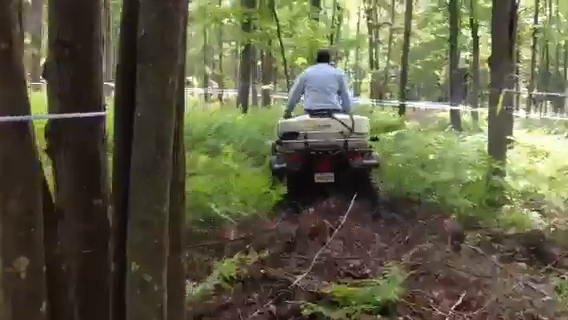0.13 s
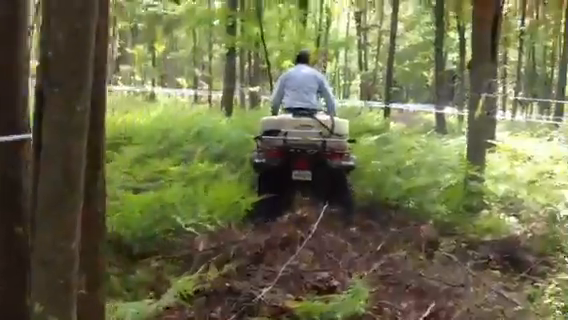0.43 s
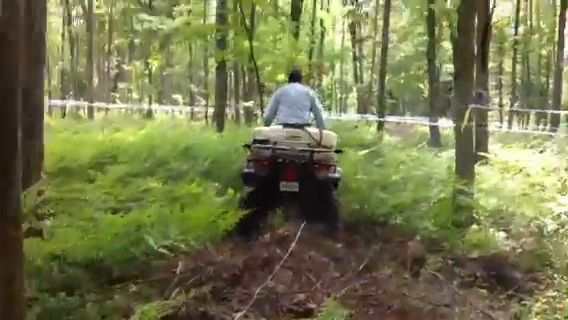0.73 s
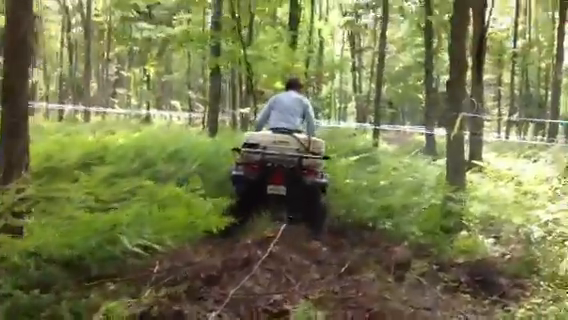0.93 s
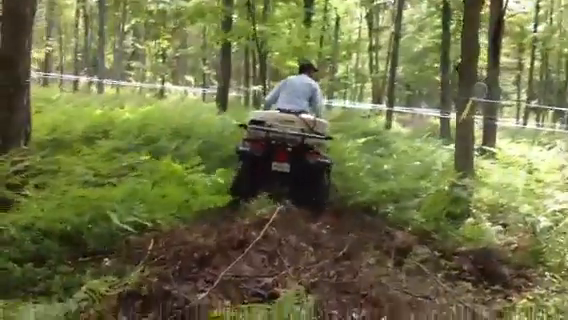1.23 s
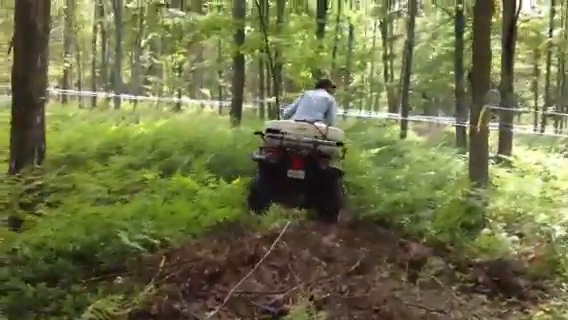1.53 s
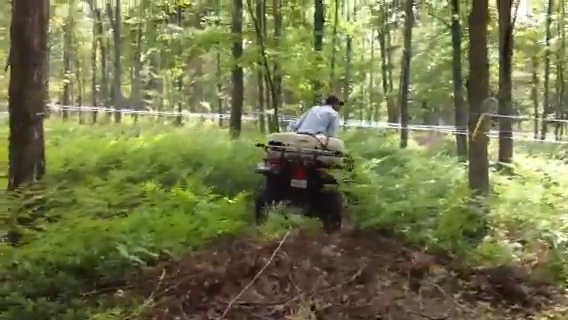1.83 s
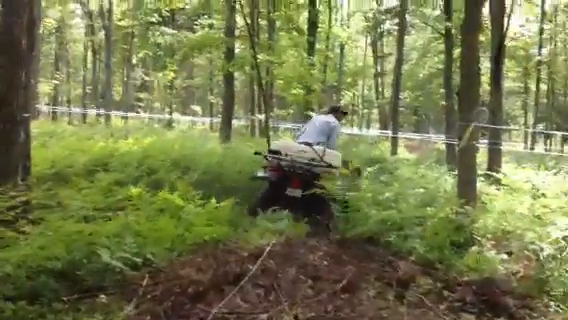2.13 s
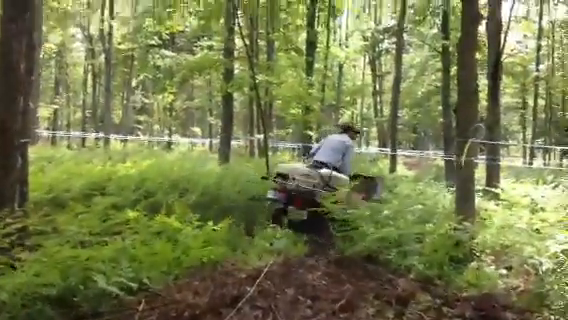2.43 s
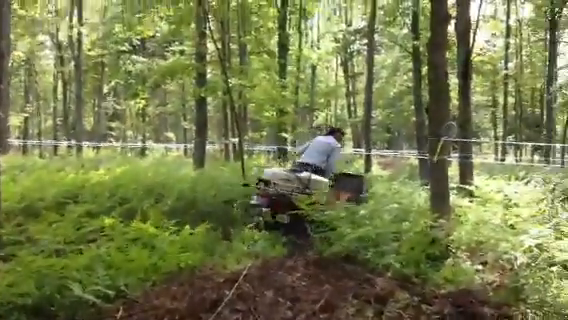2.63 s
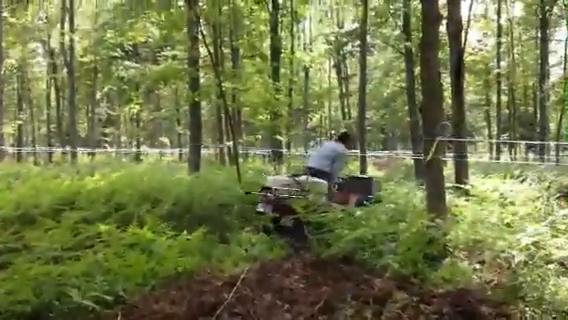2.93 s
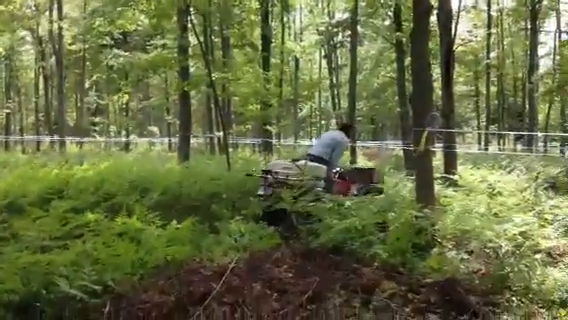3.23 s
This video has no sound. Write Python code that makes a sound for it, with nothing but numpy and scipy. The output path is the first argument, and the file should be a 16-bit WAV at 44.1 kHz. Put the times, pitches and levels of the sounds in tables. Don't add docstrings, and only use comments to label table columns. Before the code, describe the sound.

A small all-terrain vehicle engine chugs unevenly through brush, with twigs snapping and leaves hissing.

```python
import sys
import numpy as np
from scipy import signal
from scipy.io import wavfile
from scipy.ndimage import uniform_filter1d

SR = 44100
rng = np.random.default_rng(int(sys.argv[2]) if len(sys.argv) > 2 else 0)


def inscribe(sig):
    pcm = np.round(np.clip(np.atleast_2d(sig).T, -1, 1) * 32767)
    wavfile.write(sys.argv[1], SR, pcm.astype(np.int16))


def ratio_of_db(decibels):
    return 10 ** (np.asarray(decibels, float) / 20)


N = 149940

# (time [s], firing rate [1/s])
FIRING_RATE = [(0.0, 18.75), (0.18, 19.44), (0.25, 17.21), (0.58, 14.92), (0.7, 20.57), (1.03, 20.88),
               (1.21, 15.69), (1.38, 18.98), (1.69, 19.37), (1.77, 15.99), (1.88, 19.79), (2.21, 17.66),
               (2.47, 20.47), (2.66, 17.86), (2.82, 17.86), (2.94, 19.16), (3.11, 18.82), (3.4, 21.19)]
# (time [s], boom level [dB], knock level [dB], gas level [dB])
ENGINE_LOAD = [(0, -36, -45, -39), (.17, -34, -43, -37.5), (.27, -47.5, -52, -50.5),
               (.4, -40.5, -52.5, -48.5), (.53, -42, -44.5, -47), (.645, -37.5, -39.5, -34),
               (1.04, -34.5, -38, -38.5), (1.145, -42, -54, -49), (1.26, -42, -42, -42.5),
               (1.33, -34.5, -43, -34), (1.59, -40, -42.5, -42.5), (1.745, -45.5, -49, -44.5),
               (1.865, -36.5, -40, -33.5), (2.18, -40.5, -43.5, -47), (2.44, -39, -42.5, -34.5),
               (2.66, -43, -47.5, -49.5), (2.9, -42, -47, -43), (3.4, -40.5, -43, -41)]
# (time [s], brush level [dB], treble level [dB], body level [dB])
HISS_LEVELS = [(0.0, -33.5, -37, -35.5), (0.1, -34.5, -30.5, -35.5), (.2, -35, -34.5, -36.5),
               (0.38, -40, -34, -40), (0.63, -43, -34, -41.5), (0.84, -36.5, -35, -38.5),
               (1.05, -41, -35.5, -38.5), (1.3, -41, -37.5, -42.5), (1.55, -40, -36.5, -40),
               (1.8, -42.5, -39, -43), (2.08, -42.5, -37.5, -40.5), (2.3, -38.5, -37, -40),
               (2.58, -44, -38.5, -42.5), (2.74, -43.5, -39.5, -42), (3.1, -40.5, -36.5, -41),
               (3.4, -38, -37.5, -41.5)]
# (frequency [Hz], level [dB], T60 [s])
KNOCK_MODES = [(242, 0, .11), (266, -3, .075), (305, -2, .045), (350, -9, .12), (165, -2, .06)]
# (frequency [Hz], level [dB], T60 [s])
BARK_MODES = [(405, 4, 0.0032), (642, -10, 0.031), (980, 3.5, 0.0027), (1590, -11.5, 0.008),
              (2300, -10, 0.005)]
# (delay after firing [s], level [dB], rise [s], fall [s])
GAS_PUFFS = [
    (.0036, 4, .0004, .002),
    (.012, 0, .001, .0026),
    (.0205, -11, .001, .004),
    (.005, -12, .003, .018),
]
# (centre [Hz], width [Hz], gas level [dB], hiss level [dB], snap level [dB])
RESONANCES = [(328, 176, -25, -12, -17), (633, 120, -3.5, -13.5, -3.5), (860, 1080, -11, -8, 33),
              (1592, 690, 3.5, -2.5, 16), (2060, 360, -27, -15.5, 17), (3730, 810, -43, -11, -57),
              (4717, 88, -12, -16.5, -10.5), (6000, 1230, 0, -6, -8.5), (7130, 3540, -48, -1, -1),
              (11330, 1320, 2.5, -3.5, 2), (12500, 2000, -16, -4, -74)]
# (time [s], peak level [dB], centre [Hz], decay [s])
TWIG_SNAPS = [(0.0556, -8.5, 8100, 0.0026), (0.398, -15, 12200, 0.003), (0.553, -30, 7000, .002),
              (1.5819, -11.5, 6000, 0.0019), (1.733, -14.5, 6940, 0.0034), (2.097, -11.5, 6500, 0.0016),
              (2.2309, -5, 7400, 0.0011), (2.254, -21, 6000, .002), (2.316, -12, 8800, 0.0022),
              (3.012, -27, 6000, 0.0022), (3.034, -13, 8200, .002), (3.174, -16, 11000, 0.003),
              (3.2594, -9, 9000, 0.0046), (3.279, -15, 6500, 0.0043), (3.3744, -17, 9200, 0.0035),
              (3.394, -25, 8000, 0.0033)]
# (time [s], peak level [dB], centre [Hz], decay [s])
BRANCH_SNAP = [
    (3.2598, -12.5, 2500, .0045),
    (3.2605, -24, 900, .006),
]
# (time [s], peak level [dB], frequency [Hz])
PANEL_TICKS = [(0.0578, -17.5, 2050), (0.1186, -20, 1830), (0.1253, -20, 1570), (0.1613, -25, 1390),
               (0.2242, -21.5, 1880), (0.5501, -28, 2000), (0.6442, -14.5, 1650), (0.6967, -24, 1250),
               (0.7474, -25, 1370), (0.9408, -20, 1820), (0.9882, -28, 1760), (1.043, -25.5, 1580),
               (1.0846, -29, 1700), (1.2098, -25, 1700), (1.3723, -18.5, 2230), (1.425, -21.5, 1580),
               (1.4768, -22, 1590), (1.4885, -23, 1580), (1.5309, -21.5, 1710), (1.6432, -32, 1910),
               (1.696, -24, 1640), (1.8113, -28, 1550), (1.8568, -19.5, 1800), (1.9088, -17, 1880),
               (1.9574, -25, 1480), (2.0188, -27, 1820), (2.13, -22.5, 1530), (2.2927, -26.5, 1560),
               (2.339, -24, 1540), (2.3905, -25, 1810), (2.4406, -15.5, 1590), (2.4908, -20.5, 1640),
               (2.5417, -29, 1480), (2.6569, -22, 1550), (2.7122, -26, 1500), (2.825, -22.5, 1590),
               (2.8708, -25, 1630), (2.9337, -21, 1670), (3.0318, -21.5, 1590), (3.1562, -24, 1640),
               (3.1856, -35, 1470), (3.2453, -21, 1870), (3.3378, -21, 1810), (3.3843, -37, 1840)]
# (time [s], level [dB])
AIR_GULPS = [(.238, -34), (.35, -36), (.408, -32), (.468, -33), (.538, -35), (.603, -27), (1.108, -30),
             (1.153, -30), (1.218, -36), (1.278, -27), (1.715, -34), (1.77, -34)]


def curve(table, col):
    a = np.array(table)
    return np.interp(np.arange(N) / SR, a[:, 0], a[:, col])


def unit(x):
    return x / np.sqrt(np.mean(x ** 2))


def noise():
    return rng.standard_normal(N)


def band(x, hz, wide_hz):
    return signal.lfilter(*signal.iirpeak(hz, hz / wide_hz, fs=SR), x)


def ring(x, hz, t60):
    pole = np.exp((2j * np.pi * hz - np.log(1000) / t60) / SR)
    return signal.lfilter([1], [1, -pole], x).imag


def late(x, s):
    k = int(max(s, 0) * SR)
    return np.concatenate([np.zeros(k), x[:N - k]])


def swell(x, rise, fall):
    t = np.arange(int(SR / 10)) / SR
    shape = (1 - np.exp(-t / rise)) * np.exp(-t / fall)
    return signal.fftconvolve(x, shape / shape.max())[:N]


def walk(rate):
    k = int(SR / rate)
    steps = np.repeat(rng.standard_normal(N // k + 1), k)
    return 1.9 * uniform_filter1d(uniform_filter1d(steps, k), k)[:N]


def clicks(at, size):
    return np.bincount(at, size, N)[:N]


def brush():
    count = int(720 * N / SR)
    spread_db = 3 * np.minimum(rng.exponential(size=count), 4)
    size = ratio_of_db(spread_db) * ratio_of_db(2 * walk(6.85))[::N // count][:count]
    grains = swell(clicks(rng.integers(0, N, count), size), .0001, 0.00068)
    crackle = unit(grains * noise())
    out, surge = 0, walk(14)
    for hz, wide_hz, _, db, _ in RESONANCES:
        col = 2 if hz > 9000 else 1 if hz > 3000 else 3
        level = curve(HISS_LEVELS, col) + db
        if hz < 3000:
            level = level + 0.1 * (curve(ENGINE_LOAD, 3) + 40)
        level = level + .5 * surge + 1.62 * walk(14)
        out = out + ratio_of_db(level) * unit(band(noise() + ratio_of_db(-6) * crackle, hz, wide_hz))
    return ratio_of_db(-0.5) * out


def twigs():
    fall_db = 11.5
    tail, tail_s = .06, 0.024
    out = np.zeros(N)
    for s, db, centre, decay in TWIG_SNAPS + BRANCH_SNAP:
        i = int(s * SR)
        t = np.arange(min(2000, N - i)) / SR
        envelope = np.exp(-t / max(decay, 1e-4)) + tail * np.exp(-t / tail_s)
        burst = rng.standard_normal(len(t)) * envelope
        snap = 0
        for hz, wide_hz, _, _, snap_db in RESONANCES:
            gain = ratio_of_db(snap_db - fall_db * np.log2(hz / centre) ** 2)
            snap = snap + gain * band(burst, hz, wide_hz) / np.sqrt(wide_hz)
        out[i:i + 2000] += ratio_of_db(db) * snap / np.abs(snap).max()
    out = signal.sosfilt(signal.butter(2, 11800, fs=SR, output="sos"), out)
    scrape = swell(clicks(np.array([int(2.251 * SR)]), np.ones(1)), 0.0053, 0.032)
    return out + ratio_of_db(-38) * scrape * unit(band(noise(), 780, 420))


def panel():
    shake_s, edge_s, t60_s = .002, .0008, .011
    level_db, edge_db = -4, -4
    out = np.zeros(N)
    for s, db, hz in PANEL_TICKS:
        i = int(s * SR)
        t = np.arange(min(1500, N - i)) / SR
        shake = rng.standard_normal(len(t)) * np.exp(-t / shake_s)
        low = band(ring(shake, hz, t60_s), hz, 840)
        edge = band(shake * np.exp(-t / edge_s), 7700, 5000)
        tick = low / np.abs(low).max() + ratio_of_db(edge_db) * edge / np.abs(edge).max()
        out[i:i + 1500] += ratio_of_db(db + level_db) * tick
    return out


def boom(x):
    box = band(late(x, .0009), 116, 56)
    return -band(box, 122, 18)


def knock(x, modes):
    thin = signal.lfilter(*signal.butter(2, 222, "high", fs=SR), x)
    pulse = late(thin, 0.00288)
    return -sum(ratio_of_db(db) * ring(pulse, hz, t60) for hz, db, t60 in modes)


def gas_flow(at, luck, turn_db_per_s):
    flow = 0
    for k, (s, db, rise, fall) in enumerate(GAS_PUFFS):
        level = curve(ENGINE_LOAD, 3)[at] + 1.3 * luck[k]
        if k == 0:
            level = level - turn_db_per_s * at / SR
        flow = flow + ratio_of_db(db) * swell(late(clicks(at, ratio_of_db(level)), s), rise, fall)
    jet = sum(ratio_of_db(db) * unit(band(noise(), hz, wide_hz)) for hz, wide_hz, db, _, _ in RESONANCES)
    return flow * jet


def engine():
    start_turn, scatter_db, turn_db_per_s = .958, 1.2, 1.7
    turns = start_turn + np.cumsum(curve(FIRING_RATE, 1)) / SR
    at = np.flatnonzero(np.diff(np.floor(turns)))
    luck = rng.standard_normal((8, len(at)))
    even = clicks(at, np.ones(len(at)))

    def fire(col, k):
        return clicks(at, ratio_of_db(curve(ENGINE_LOAD, col)[at] + scatter_db * luck[k]))

    gulp_at = (np.array(AIR_GULPS)[:, 0] * SR).astype(int)
    gulps = clicks(gulp_at, ratio_of_db(np.array(AIR_GULPS)[:, 1]))
    gulp_shape = swell(clicks(gulp_at, np.ones(len(AIR_GULPS))), .005, .03)
    damp = 1 - .6 * np.minimum(gulp_shape, 1)

    pipe = damp * boom(fire(1, 0)) / boom(even).std()
    pipe = pipe + knock(fire(2, 1), KNOCK_MODES) / knock(even, KNOCK_MODES).std()
    pipe = pipe + ring(gulps, 320, .022)
    pipe = pipe - band(pipe, 203, 45)
    pipe = pipe + ratio_of_db(1) * ring(gulps, 178, .044)

    turning = ratio_of_db(-turn_db_per_s * np.arange(N) / SR)
    bark = knock(fire(3, 7) * turning, BARK_MODES) / knock(even, BARK_MODES).std()
    return pipe + ratio_of_db(-5.5) * bark + ratio_of_db(1.5) * gas_flow(at, luck[2:6], turn_db_per_s)


def scene():
    dry = engine() + twigs() + panel()
    echo_db, echo_s = -14, .06
    t = np.arange(int(.3 * SR)) / SR
    trunks = rng.standard_normal(len(t)) * np.exp(-t / echo_s) * (t > .004)
    wet = signal.fftconvolve(dry, trunks / np.sqrt(np.sum(trunks ** 2)))[:N]
    return (dry + ratio_of_db(echo_db) * wet + brush())[None]


def low_pass(x):
    return signal.sosfilt(signal.butter(12, 16410, fs=SR, output="sos"), x)


def record(dry):
    x = signal.sosfiltfilt(signal.butter(3, 81, "high", fs=SR, output="sos"), dry, padtype="constant")
    x = x + ratio_of_db(-75.5) * unit(band(noise(), 35, 40))
    x = x - .3 * band(x, 3130, 1180)
    x = signal.sosfilt(signal.butter(2, 13000, fs=SR, output="sos"), x)
    x = signal.sosfilt(signal.ellip(10, .2, 50, 15300, fs=SR, output="sos"), x)
    return low_pass(x)


dry = scene()
out = record(dry)
inscribe(out)
```